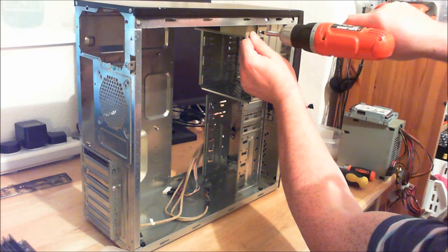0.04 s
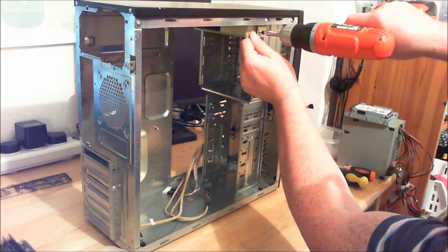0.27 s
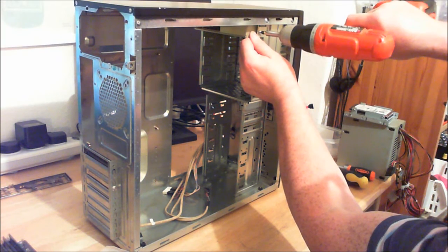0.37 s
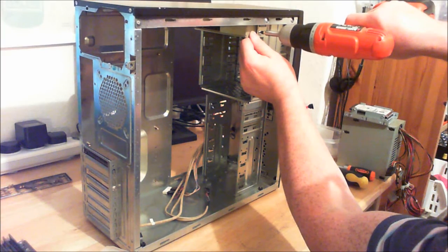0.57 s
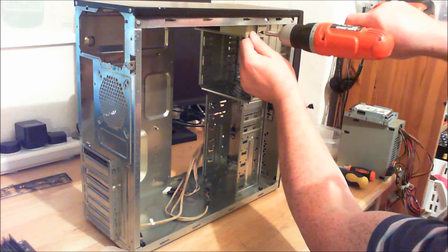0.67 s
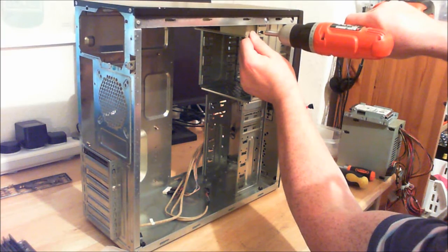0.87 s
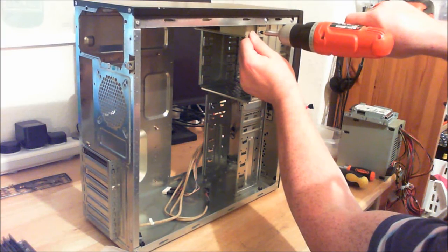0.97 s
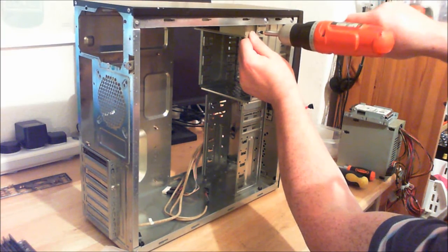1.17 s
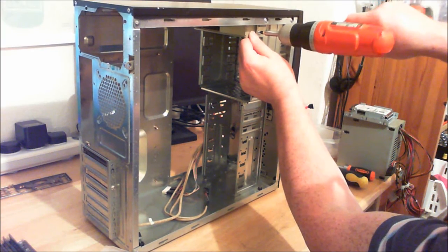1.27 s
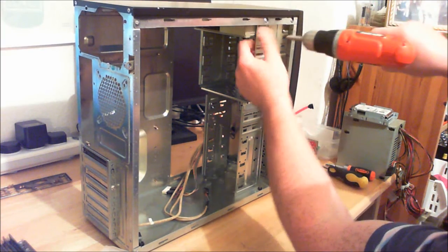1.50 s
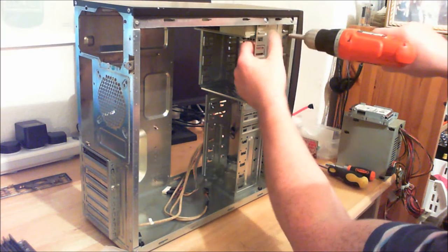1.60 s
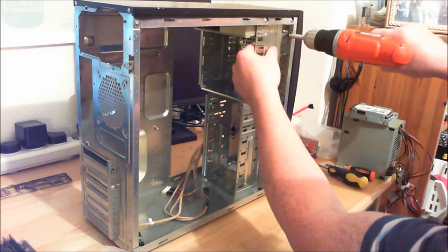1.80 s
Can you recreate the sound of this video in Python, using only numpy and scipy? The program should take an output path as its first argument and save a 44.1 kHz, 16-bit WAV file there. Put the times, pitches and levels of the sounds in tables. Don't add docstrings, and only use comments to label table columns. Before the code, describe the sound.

Cordless drill spinning up into a humming growl, then a rapid metallic clutch rattle on a steel case.

```python
import sys
import numpy as np
from scipy import signal
from scipy.fft import rfft, irfft, dct, next_fast_len
from scipy.io import wavfile
from scipy.ndimage import uniform_filter1d, map_coordinates

SR = 44100
rng = np.random.default_rng(int(sys.argv[2]) if len(sys.argv) > 2 else 0)


def boost(x):
    u = np.asarray(x, float) / 20
    return 10 ** u


def dump(signal):
    limited = np.clip(np.atleast_2d(signal).T, -1, 1)
    pcm = np.round(limited * 32767).astype(np.int16)
    wavfile.write(sys.argv[1], SR, pcm)


N = 81585
T = np.arange(N) / SR
CLUTCH_START_S, CLUTCH_HZ = .7504, 40.6


def unit(x):
    return x / np.sqrt(np.mean(x ** 2) + 1e-20)


def along(points, hz):
    f, v = np.transpose(points)
    return np.interp(np.log(hz + 1), np.log(f + 1), v)


def curves(rows):
    s, *cols = np.transpose(rows)
    return [np.interp(T, s, c) for c in cols]


def wobble(rate):
    knots = rng.standard_normal(int(N * rate / SR) + 4)
    return map_coordinates(knots, [np.arange(N) * rate / SR])


def filtered(x, response):
    m = next_fast_len(N + SR // 2)
    return irfft(rfft(x, m) * response(np.fft.rfftfreq(m, 1 / SR)), m)[..., :N]


def rush(spectrum, grain=1):
    z = signal.stft(grain * rng.standard_normal(N), nperseg=512)[2]
    field = uniform_filter1d(rng.standard_normal(z.shape), size=5, axis=0)
    field = uniform_filter1d(field, size=6, axis=1)
    patchy_db = 1.2
    noise = signal.istft(z * boost(patchy_db * unit(field)), nperseg=512)[1][:N]
    return unit(filtered(noise, lambda hz: boost(along(spectrum, hz))))


def resonances(peaks):
    def response(f):
        total = 0
        for k, (c, w, db) in enumerate(peaks):
            total = total + (-1) ** k * boost(db) * 1j * f * w / (c * c - f * f + 1j * f * w)
        return total
    return response


def commutator(phase):
    # multiple of its pitch, level driving/dB, level with clutch slipping/dB
    bars = [(1, -13, -10), (2, -17, -16), (3, -8, -9), (4, 2, 4), (5, -4, -9), (6, -5, -3), (7, -5, -10),
            (8, 0, -5), (9, -7, -7), (10, -10, -10), (11, -11, -9), (12, -13, -10)]
    slipping = np.clip((T - CLUTCH_START_S) / 0.033, 0, 1)
    lines = np.zeros(N)
    for k, db, late_db in bars:
        level_db = db + slipping * (late_db - db) + 1.3 * wobble(25.1)
        lines += boost(level_db) * np.sin(k * phase + 0.27 * wobble(30) + rng.uniform(0, 2 * np.pi))
    power_on_s, power_off_s = .25, 1.04
    powered = np.clip((T - power_on_s) / 0.04, 0, 1) * np.clip((power_off_s - T) / 0.01 + 1, .15, 1)
    return boost(-4) * powered * unit(lines)


def gearbox(phase):
    # f/Hz, level per Hz/dB
    gear_colour = [(60, -26), (300, -8), (1050, -6), (1250, -5.5), (4000, -6), (11500, -6), (12100, -9),
                   (15700, -27.5)]
    tooth_depth, grit_db = 0.22, 1.5
    turning = 1 + tooth_depth * np.cos(phase / 3)
    grain = turning * boost(grit_db * wobble(900) + 1.1 * wobble(19.56))
    return boost(2) * rush(gear_colour, grain)


def case_hum(effort):
    # f/Hz, width/Hz, level/dB
    hum_pitches = [(115.5, 16.4, -1), (151, 16.6, -1), (396, 12, -2.5), (648, 28, -1.5), (858, 23, -3),
                   (1012, 110, -4)]
    hum = unit(filtered(rng.standard_normal(N), resonances(hum_pitches)))
    bite_db, bite_s, bite_t60_s = -31.5, .205, 0.47
    bite = boost(bite_db - 60 * np.abs(T - bite_s) / bite_t60_s) * (T > bite_s)
    return (bite + effort * boost(-10)) * hum


def starting_surge(phase):
    peak_s, width_s = 0.29, 0.055
    swell = np.exp(-((T - peak_s) / width_s) ** 2)
    return boost(-25 + 2.2 * wobble(68)) * swell * np.sin(phase + 0.57 * wobble(78.4))


def motor():
    # t/s, commutator pitch f/Hz
    speed = [(.2, 448.4), (.24, 611), (.27, 753), (.3, 857), (.34, 932), (.39, 972.4), (.5, 977),
             (.74, 972), (.8, 987.4), (1.0, 990), (1.05, 975), (1.1, 930), (1.2, 696)]
    # t/s, level/dB
    effort_points = [(.17, -47), (.2, -42), (.23, -31), (.265, -21.5), (.35, -20.5), (.72, -19),
                     (.78, -16.5), (1.08, -19.5), (1.13, -34.5), (1.2, -55), (1.26, -79)]
    hz, = curves(speed)
    phase = 2 * np.pi * np.cumsum(hz) / SR
    fade_in = np.clip((T - effort_points[0][0]) / 0.015, 0, 1)
    fade_out = np.clip((effort_points[-1][0] - T) / .03, 0, 1)
    effort = boost(curves(effort_points)[0]) * fade_in * fade_out
    whirr = starting_surge(phase) + effort * gearbox(phase) + case_hum(effort)
    return whirr, effort * commutator(phase)


def clutch():
    # f/Hz, level per Hz/dB
    clack = [(300, -40), (1000, -8), (1500, -12), (2700, -4), (4400, -1), (5600, -8.5), (11500, -8.5),
             (15700, -40)]
    # f/Hz, width/Hz, level/dB
    panel = [(45, 26.8, -11), (78, 19, -1.5), (120.94, 17.3, 3), (281, 12, 0), (408, 18, -7.5),
             (568.4, 40, -9.5), (933, 47, -12.5), (1053, 45, -10)]
    # f/Hz, width/Hz, level/dB
    loose = [(167, 95, -11), (300, 27, -1.5), (418, 52, -3.5), (588, 92, -4.5), (758, 143, -7.5),
             (995, 110, -5), (1868, 330, -13)]
    ramp_db, first_db = [0, -8, -4, -8], 4
    slip_fade, panel_fade = 11, 18
    rise_s, hold_s, slip_t60_s, buzz_t60_s = .0004, .008, .06, .2
    bursts, buzz, blows = np.zeros(N), np.zeros(N), np.zeros(N)
    t = np.arange(SR // 4) / SR
    rise = 1 - np.exp(-t / rise_s)
    for k, (late, size) in enumerate(rng.standard_normal((15, 2))):
        s = k / CLUTCH_HZ
        i = round((CLUTCH_START_S + s + .0008 * late * (k > 0)) * SR)
        db = ramp_db[k % 4] + first_db * (k == 0) - slip_fade * s + 0.67 * size
        bursts[i:][:len(t)] += boost(db - 60 * np.maximum(t - hold_s, 0) / slip_t60_s) * rise
        buzz[i:][:len(t)] += boost(0.63 * size - 60 * t / buzz_t60_s) * rise
        blows[i] = boost(-panel_fade * s + 1.4 * size)
    blows[round((CLUTCH_START_S - 1 / CLUTCH_HZ) * SR)] = boost(-4)
    ring = filtered(blows, resonances(panel))
    ring = ring / np.abs(ring).max()
    rattle = unit(filtered(rng.standard_normal(N), resonances(loose)))
    return boost(-12.5) * bursts * rush(clack) + boost(-8) * ring + boost(-21) * buzz * rattle


def trigger():
    # t/s, f/Hz, level/dB
    whine = [(.163, 3920, -38), (.175, 4050, -38), (.187, 4200, -38), (.2, 4600, -35), (.215, 4850, -34),
             (.23, 4950, -36), (.25, 5000, -55)]
    # multiple, level/dB
    overtones = [(2, -6), (3, -16)]
    hz, db = curves(whine)
    phase = 2 * np.pi * np.cumsum(hz * (1 + .03 * wobble(500))) / SR
    tone = np.sin(phase)
    for k, level in overtones:
        tone = tone + boost(level) * np.sin(k * phase)
    gate = np.clip((T - whine[0][0]) * 500, 0, 1) * (T < whine[-1][0])
    return boost(db + 4 * wobble(350)) * tone * gate


def ticks():
    # t/s, level/dB, f/Hz, width/Hz
    touches = [
        (0.038, -59, 4300, 1500),
        (0.025, -48, 1730, 1100),
        (0.0048, -54, 2300, 860),
        (1.322, -54.5, 8900, 800),
        (1.075, -12, 736, 240),
        (.49, -17, 2517, 240),
        (.207, -28.5, 800, 450),
        (0.89, -13, 1100, 120),
    ]
    t60_s, rise_s = .1, 0.0021
    out, t = np.zeros(N), np.arange(SR // 10) / SR
    for s, db, hz, width_hz in touches:
        peak = resonances([(hz, width_hz, 0)])
        ring = unit(filtered(rng.standard_normal(N), lambda f: peak(f) ** 2))
        out[round(s * SR):][:len(t)] += boost(db - 60 * t / t60_s) * np.clip(t / rise_s, 0, 1) * ring[:len(t)]
    return out


def sleeve():
    # start t/s, peak t/s, end t/s, level/dB
    brushes = [
        (1.393, 1.52, 1.62, -47.5),
        (1.649, 1.707, 1.78, -59),
    ]
    # f/Hz, level per Hz/dB
    cloth = [(1290, -31), (2200, -24), (2510, -14), (2630, -25), (2960, -11), (9080, -8.5), (15600, -17)]
    swell = sum(boost(db) * np.interp(T, [a, b, c], [0, 1, 0]) ** .7 for a, b, c, db in brushes)
    return swell * rush([(1500, -56)] + list(cloth), boost(1.8 * wobble(460) + 0.43 * wobble(59.4)))


def room(x):
    # f/Hz, time/s
    fade_times = [(100, 0.96), (500, 0.46), (2000, 0.29), (10000, 0.25)]
    hz, t, z = signal.stft(rng.standard_normal(SR // 2), SR, nperseg=256)
    tail = signal.istft(z * boost(-60 * t / along(fade_times, hz)[:, None]), SR, nperseg=256)[1]
    late = np.pad(x, (300, 0))
    return boost(-7.5) * signal.fftconvolve(late, tail / np.linalg.norm(tail))[:N]


def air():
    # f/Hz, level per Hz/dB
    air_colour = [(8, -4), (40, -9.5), (80, -16.5), (150, -15.5), (500, -26), (1000, -28.5), (1500, -39),
                  (15700, -52)]
    return boost(-42 + 1.9 * wobble(5.96)) * rush(air_colour)


def thinned(x):
    # centre t/s, kept whole below f/Hz
    moments = [
        (0.177, 300),
        (.222, 1280),
        (.437, 60),
        (1.013, 1200),
        (1.226, 1530),
        (1.354, 1990),
    ]
    kept_share, kept_gain = .045, 1.5
    out, size = x.copy(), round(.029 * SR)
    window = np.sin(np.pi * (np.arange(size) + .5) / size)
    hz = np.arange(size) * SR / 2 / size
    for s, whole_hz in moments:
        start = round(s * SR) - size // 2
        part = slice(start, start + size)
        z = dct(window * x[0, part], norm="ortho")
        above = hz > whole_hz
        weight = np.abs(z) / uniform_filter1d(np.abs(z), size=101) ** 0.83
        weak = above & (weight < np.quantile(weight[above & (hz < 13000)], 1 - kept_share))
        removed = np.where(weak, 1, (1 - kept_gain) * above)
        out[0, part] -= window * dct(z * removed, type=3, norm="ortho")
    return out


def scene():
    whirr, lines = motor()
    near = whirr + clutch() + trigger() + ticks() + sleeve()
    sent = filtered(near + .15 * lines, lambda f: (1j * f / (150 + 1j * f)) ** 2)
    return (near + lines + room(sent) + air())[None]


def band_limit(x):
    return signal.sosfilt(signal.butter(12, 15750, fs=SR, output="sos"), x)


def record(dry):
    # t/s, share of full scale
    offset = [(0, -0.041), (.65, -.051), (.95, -.037), (1.15, -0.028), (1.85, -0.023)]
    x = thinned(dry) + curves(offset)[0]
    mix = x / (1 + np.abs(x) ** 8) ** (1 / 8)
    return band_limit(mix)


dry = scene()
out = record(dry)
dump(out)
```